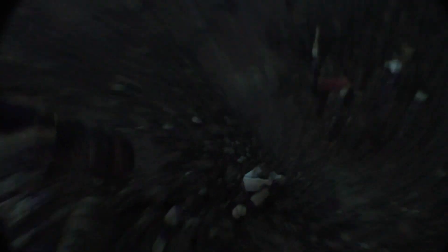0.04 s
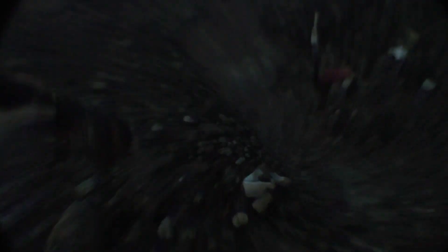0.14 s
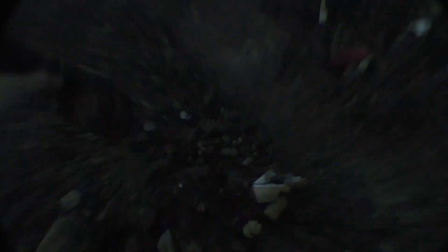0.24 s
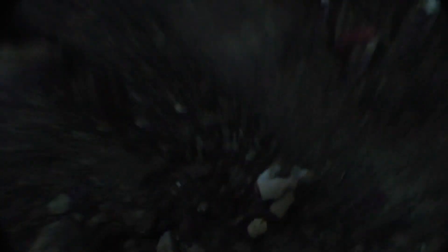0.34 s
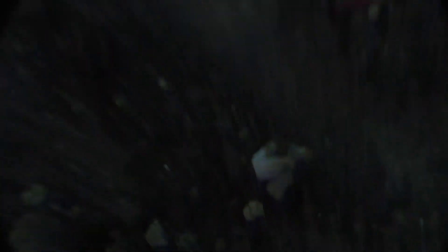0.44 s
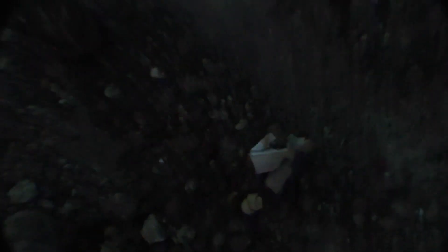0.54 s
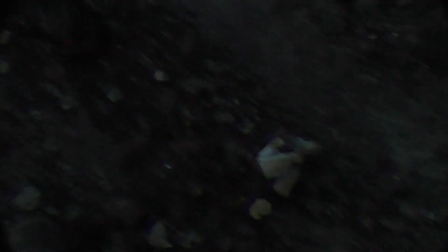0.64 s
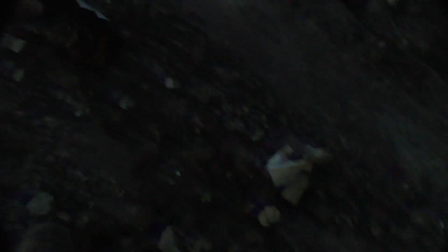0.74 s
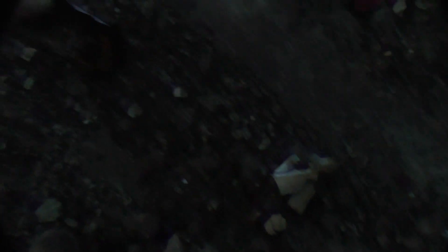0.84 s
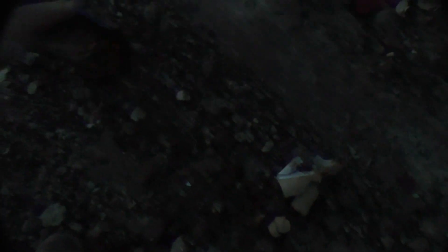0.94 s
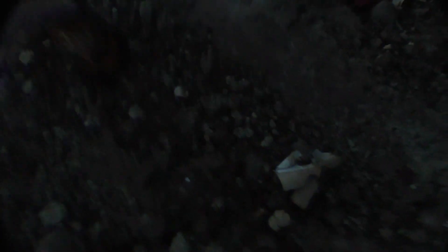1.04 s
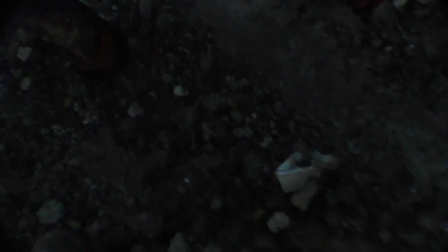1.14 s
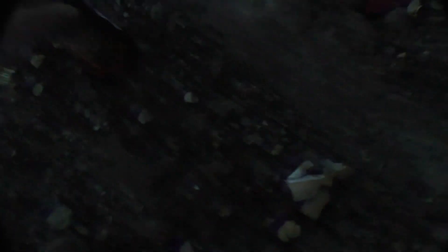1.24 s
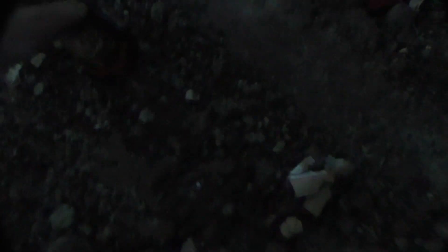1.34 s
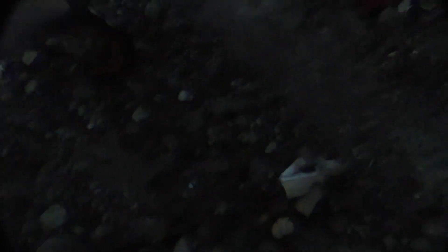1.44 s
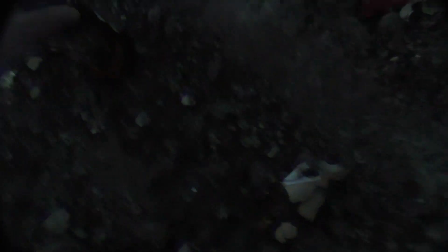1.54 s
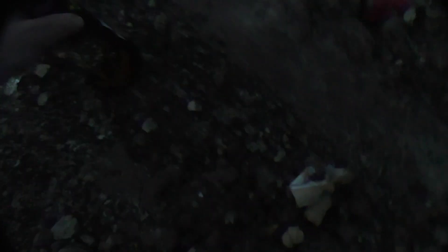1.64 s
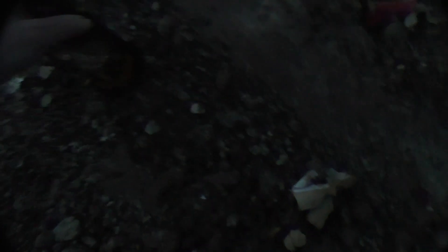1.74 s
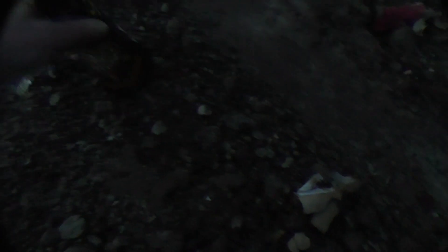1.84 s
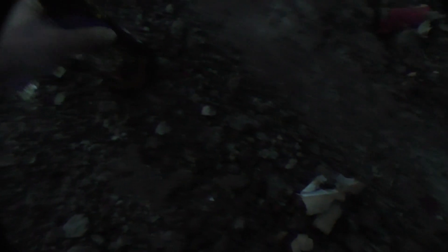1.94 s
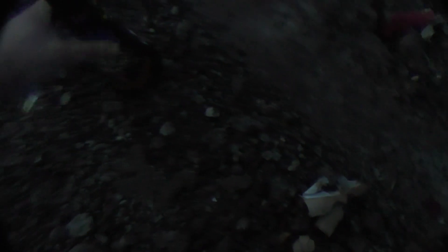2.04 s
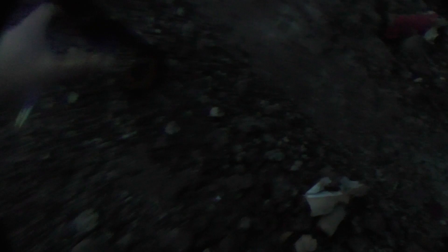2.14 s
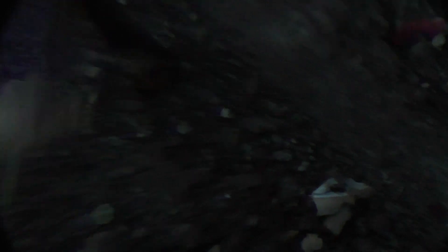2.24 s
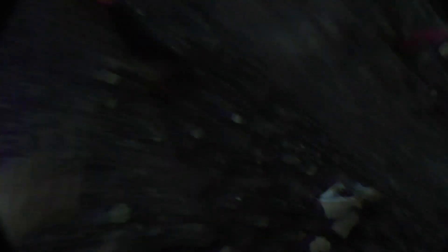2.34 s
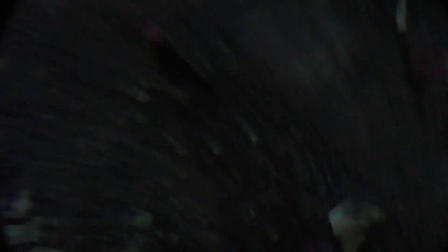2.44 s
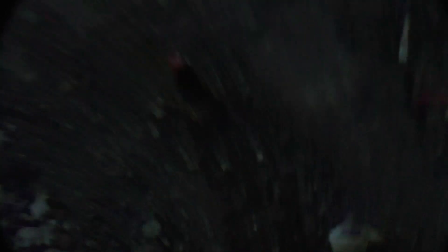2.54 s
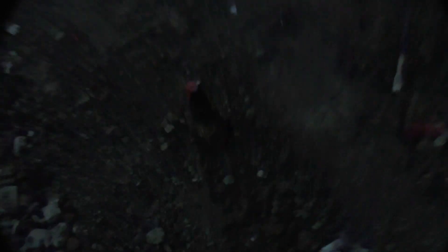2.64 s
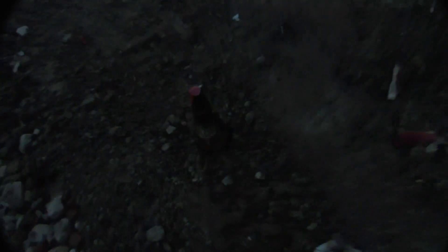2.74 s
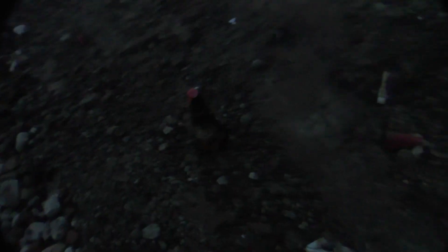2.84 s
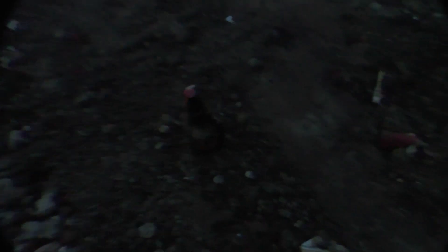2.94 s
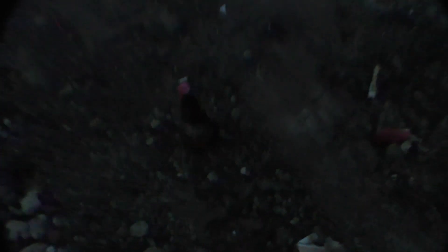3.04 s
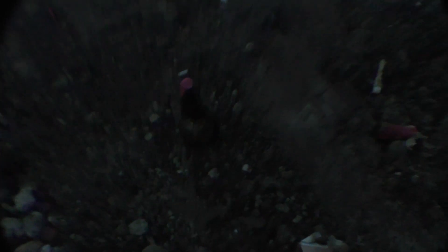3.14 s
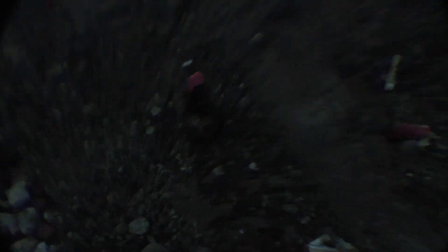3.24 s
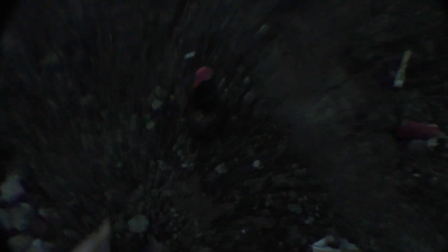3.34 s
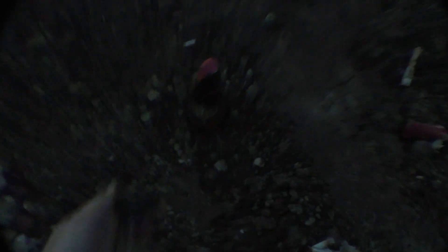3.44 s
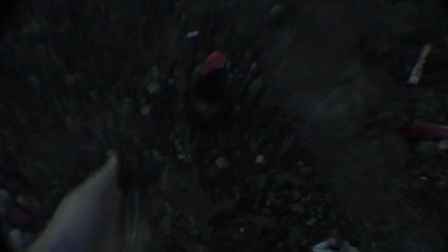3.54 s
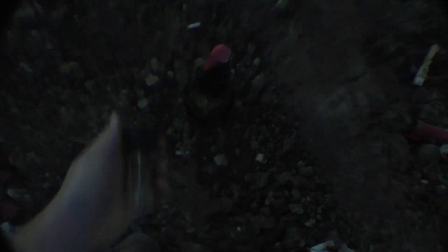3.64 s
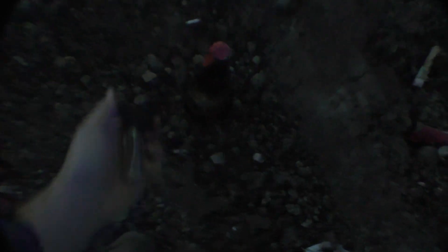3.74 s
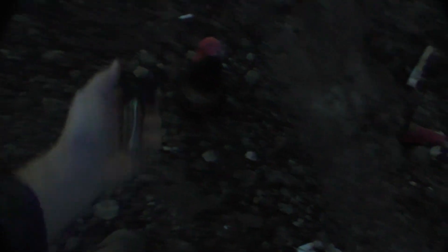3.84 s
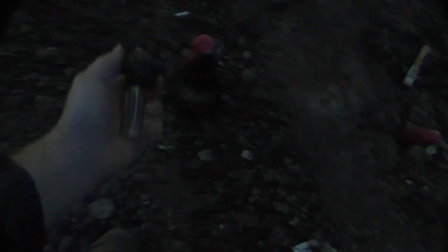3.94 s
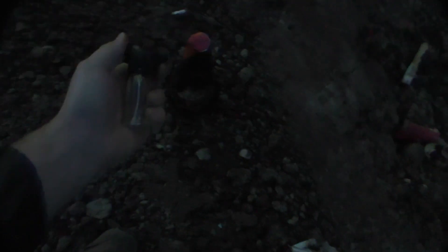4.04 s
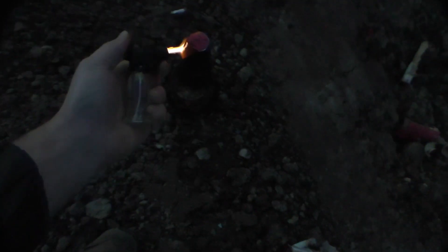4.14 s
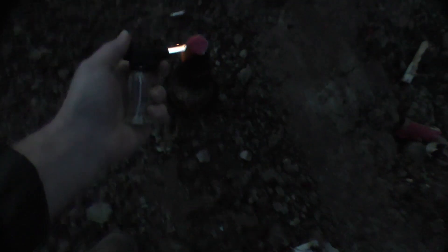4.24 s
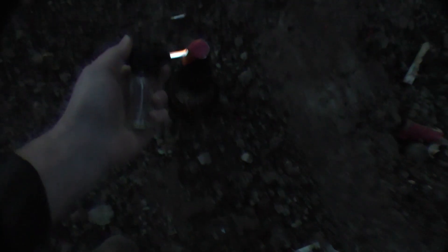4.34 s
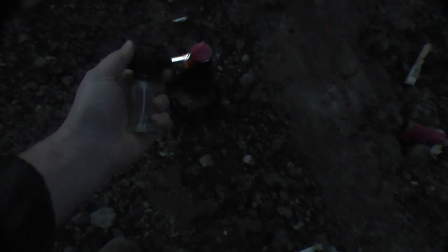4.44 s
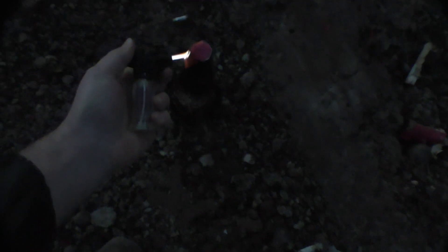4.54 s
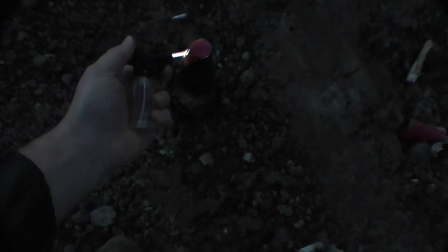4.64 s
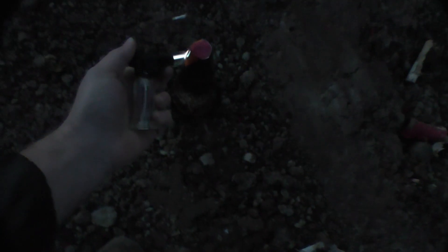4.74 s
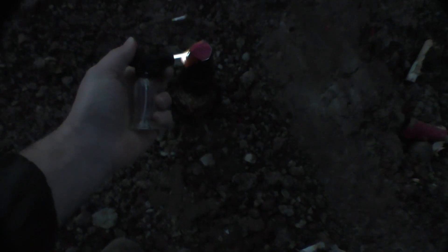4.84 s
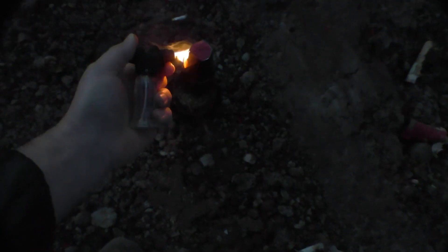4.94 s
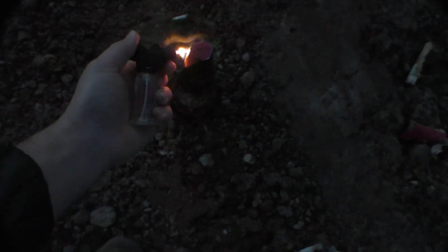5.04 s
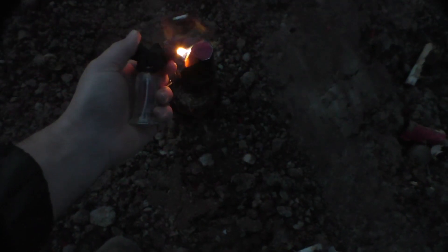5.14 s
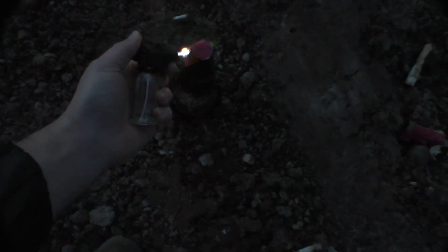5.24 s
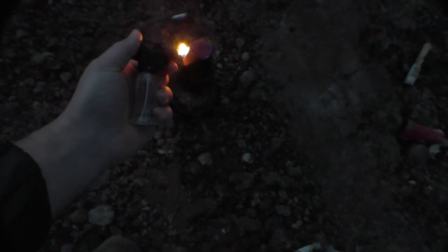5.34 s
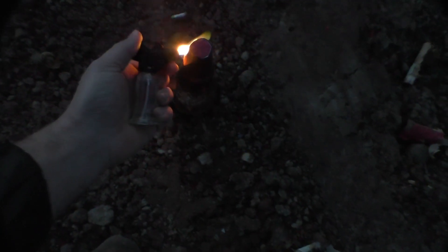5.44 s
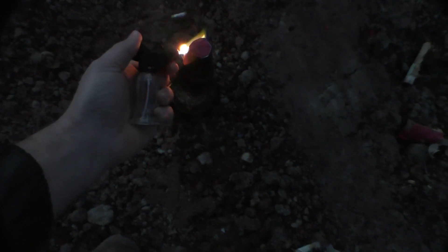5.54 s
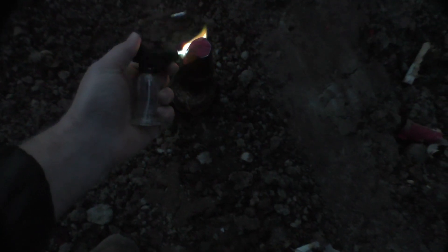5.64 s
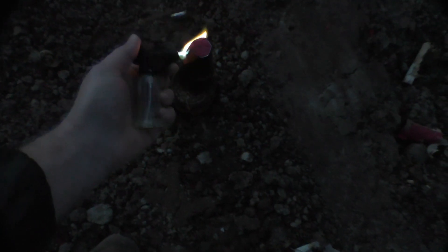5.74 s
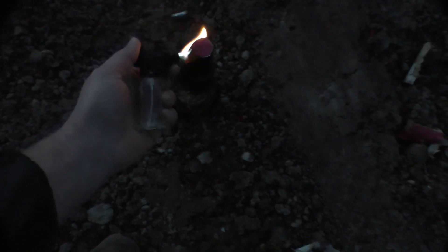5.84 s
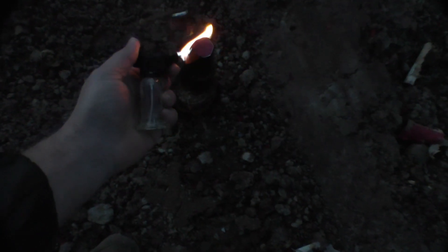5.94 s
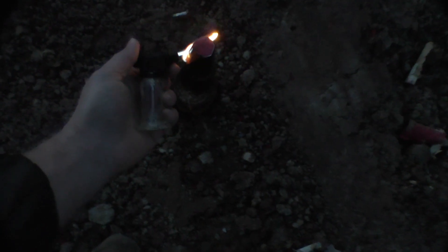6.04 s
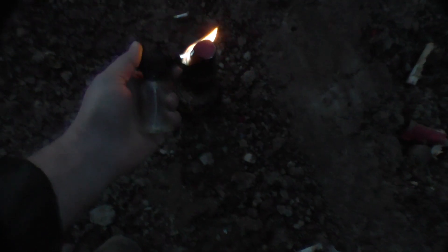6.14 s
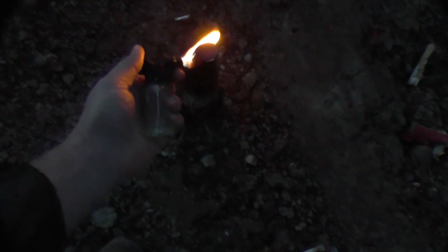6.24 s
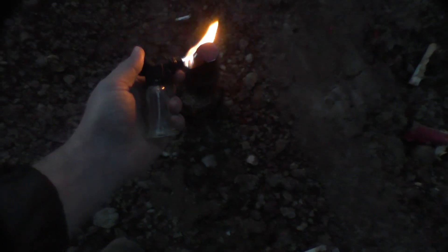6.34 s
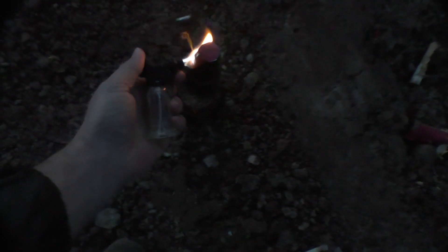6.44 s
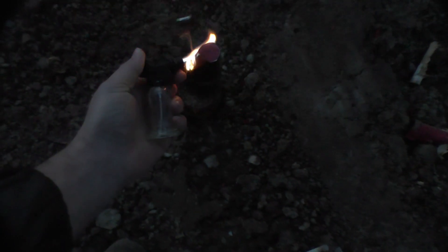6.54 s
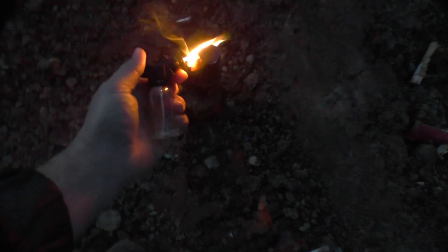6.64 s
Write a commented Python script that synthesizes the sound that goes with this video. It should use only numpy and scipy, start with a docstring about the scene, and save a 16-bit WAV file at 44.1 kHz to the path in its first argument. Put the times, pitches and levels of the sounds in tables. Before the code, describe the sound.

Shoes grind and knock over loose stones outdoors, then a jet lighter snaps sharply and roars softly and steadily, with tiny sizzling spits at the end.

```python
"""Open stony ground: someone shuffles, then a jet lighter snaps on and roars at a small firework.
Feet: dense random grains grind and hiss over a low hum; scuffs, one drag, damped thuds and stone knocks.
Lighter: clicks ring a bank of body modes; the jet is coloured noise with hiss, whistle and a close echo.
Firework: clicks ring the heated tip over a fine sizzle of grains.
Behind: a quiet rumble of air, and a deep handling rumble while the feet move."""
import sys
import numpy as np
from scipy import signal
from scipy.fft import rfft, irfft, next_fast_len
from scipy.io import wavfile

SR = 44100
rng = np.random.default_rng(int(sys.argv[2]) if len(sys.argv) > 2 else 0)


def put_to_file(sound):
    """Save the sound as 16-bit audio at rate SR, in the file named by the first command-line argument."""
    columns = np.atleast_2d(sound).T  # one column per channel
    safe = np.clip(columns, -1, 1)
    whole_steps = np.round(safe * 32767)
    wavfile.write(sys.argv[1], SR, whole_steps.astype(np.int16))


N = 295470
TIME = np.arange(N) / SR

# Open air, spectrum: freq_hz, relative_density_db
AIR_SPECTRUM = [(12, -20), (20, 0.5), (116, -7.5), (138, -7), (222, -11.5), (255, -15), (328, -18.5),
                (357, -19.5), (1260, -21.5), (1370, -23.5), (1530, -24.5), (4540, -58.5), (7110, -42),
                (10800, -50.5), (16000, -42)]
# Left-right correlation of the air: freq_hz, correlation_0_to_1
AIR_LIKENESS = [(25, 0), (70, 0.84), (1000, 0.63), (3000, 0.6), (10000, 0.24)]
# Left-right correlation of the ground: freq_hz, correlation_0_to_1
GROUND_LIKENESS = [(200, 0.83), (700, 0.9), (1600, 0.77), (4000, 0.42), (7500, 0.24), (13000, 0)]
# Left-right correlation of the jet and tip: freq_hz, correlation_0_to_1
JET_LIKENESS = [(500, 0.98), (3500, 1), (7000, 1), (14000, 0.87)]
# Flow of the sliding grit: time_s, relative_level_db
SLIDE_FLOW = [(0.0, -53), (0.042, -44.5), (0.46, -39.5), (0.78, -42.5), (1.2, -40.5), (1.32, -43.5),
              (1.462, -42.5), (1.55, -49.5)]
# Coarse grinding grains, spectrum: freq_hz, relative_density_db
GRIND_SPECTRUM = [(59, -32), (100, 3), (113, -8), (210, -3.5), (313, -5.5), (366, -2.5), (401, -7),
                  (937, -1.5), (1690, -5), (2030, -8), (2640, -15.5), (2940, -21), (4000, -18),
                  (5200, -18.5), (8800, -120)]
# Fine hissing grit, spectrum: freq_hz, relative_density_db
GRIT_HISS_SPECTRUM = [(2200, 2), (3000, -7.5), (4800, -11.5), (5600, -3.5), (8200, 1.5), (9500, -3.5),
                      (10900, -12), (12500, -5), (14500, -3.5), (16000, -13.5)]
# Position of the feet: time_s, left_minus_right_db
FEET_SIDE = [(0.05, 7), (0.52, 3), (1.44, -1.5), (2.31, 7.5), (3.11, 0), (3.23, 4), (4.1, 7.5)]
# Sole presses and scuffs over gravel: peak_s, level_db, half_length_s
SCUFFS = [(0.065, -37.5, .035), (0.5, -40.5, 0.058), (0.79, -38, 0.013), (1.06, -40.5, 0.058),
          (1.578, -42, 0.017), (1.69, -55.5, 0.063), (2.29, -54.5, 0.091), (2.54, -45.5, 0.034),
          (2.66, -47, 0.08), (2.913, -49, 0.018), (3.032, -39, 0.017), (3.1, -44, .035), (3.27, -54, 0.12),
          (3.57, -54, 0.3)]
# Scuffed pebbles, spectrum: freq_hz, relative_density_db
SCUFF_SPECTRUM = [(88, -28), (150, -9), (285, -3.5), (503, -2.5), (596, -5.5), (738, -2.5), (1130, -7.5),
                  (1780, -8), (3290, -26), (4500, -32.5), (5850, -72), (9900, -120)]
# Rustling sand, spectrum: freq_hz, relative_density_db
RUSTLE_SPECTRUM = [(2500, -33), (3400, -9), (4700, -6.5), (5800, 1), (8200, 1.5), (10800, -11),
                   (13000, -0.5), (16000, -17)]
# Sole dragging over one stone: time_s, resonance_hz, level_db
DRAG = [(2.57, 1285, -72), (2.6, 1496, -48.5), (2.66, 1732, -56), (2.77, 1730, -58), (2.84, 1690, -72)]
# Footfalls: start_s, level_db, pitch_hz, swell_cycles
THUDS = [(0.0325, -17, 228, 0.23), (0.258, -31, 225, .36), (0.4455, -17.5, 314, 0.95),
         (0.6135, -15.5, 192, 0.23), (1.1232, -15, 213, 0.29), (2.6995, -29, 310, 0.58),
         (2.896, -34.5, 230, 0.51), (3.033, -32.5, 280, .35), (3.398, -40.5, 397, 1.2)]
# Stones knocking together: start_s, level_db, pitch_hz, swell_cycles
STONES = [(0.0354, -15.5, 1290, 1.34), (0.0394, -19, 1480, 0.67), (0.2338, -19.5, 1060, 0.41),
          (0.2587, -21, 930, .4), (0.4455, -14.5, 826, 1.34), (0.6147, -17, 900, 0.45),
          (1.0847, -15, 1910, 0.4), (1.0964, -24.5, 1610, 2.3), (1.124, -19.5, 1060, 0.46),
          (1.759, -37, 1750, 1.2), (2.2494, -27, 1280, 0.43), (2.3058, -39.5, 1340, 0.69),
          (2.559, -37, 876, 2), (2.592, -32, 1210, 0.92), (2.6988, -28.5, 1200, 0.2),
          (2.9177, -29, 960, 0.21), (2.9832, -31, 1160, 0.2), (3.037, -24, 730, 0.27),
          (3.0814, -28, 1070, 0.71), (3.122, -35, 580, 1.3), (3.135, -26, 730, 0.24),
          (3.19, -33.5, 1670, 0.56), (3.311, -47.5, 4000, 0.71), (3.340, -31, 1490, 0.89),
          (3.5307, -28, 810, 0.19), (3.578, -35.5, 1560, .6)]
# Sharp ticks of grit: start_s, relative_level_db
GRIT_TICKS = [(0.4652, -23.5), (0.6314, -25), (1.6995, -46.5), (2.169, -48.5), (2.2218, -45.5),
              (2.5604, -50), (3.0049, -43), (3.0804, -40), (3.129, -43), (3.5089, -50)]
# Igniter hammer, strike and rebounds: start_s, relative_level_db
SNAP = [(4.1446, 0), (4.1454, -5), (4.1465, -11)]
# Modes of the lighter body: freq_hz, relative_level_db, t60_s
LIGHTER_MODES = [(942, -25.5, 0.03), (1850, -8, 0.026), (2170, -9.5, 0.011), (2750, -15, 0.0098),
                 (4030, -16, 0.0044), (5350, -14.5, 0.014), (5890, -7, 0.0089), (7060, -14, 0.014),
                 (8090, -14, 0.017), (9160, -25, 0.024), (11680, -19, 0.01), (12500, -18, 0.0062),
                 (13700, -11, 0.0051), (16600, -17, .009)]
# Strength of the jet: time_s, relative_level_db
JET_STRENGTH = [(4.18, -38), (4.52, -42), (5.6, -48), (5.99, -44), (6.17, -45), (6.7, -44.5)]
# Roaring flame, spectrum: freq_hz, relative_density_db
ROAR_SPECTRUM = [(250, -20), (400, -8), (520, -3), (680, -1), (1000, 0), (1250, -3), (1650, -6),
                 (2000, -10), (2300, -21.5), (2800, -25), (3300, -38), (4200, -37), (5200, -54)]
# Hissing gas, spectrum: freq_hz, relative_density_db
JET_HISS_SPECTRUM = [(3000, -20), (4500, -11), (5700, 3.5), (7200, 2), (9300, -3), (10700, -17.5),
                     (16000, -18)]
# Flame splashing on the tip: peak_s, level_db, half_length_s
FLARES = [(5.45, -66.5, 0.09), (5.78, -59, 0.064), (6.29, -62.5, .04)]
# Splashing flame, spectrum: freq_hz, relative_density_db
FLARE_SPECTRUM = [(2300, 11.5), (3000, 0), (4000, -5.5), (4700, -11.5), (5800, -2), (7000, -5.5)]
# Whistle swells as the gas flow wavers: peak_s, level_db, half_length_s
WHISTLE_SWELLS = [(4.74, -60, .06), (4.97, -60.5, 0.097), (5.35, -58, 0.12), (5.8, -60.5, 0.14),
                  (6.1, -61, 0.055)]
# Nozzle whistle, spectrum: freq_hz, relative_density_db
WHISTLE_SPECTRUM = [(10500, -35), (11800, -11.5), (13200, -3), (14400, 3), (15200, 1.5), (16000, -18)]
# Spits of the heated tip: start_s, relative_level_db
SPITS = [(5.7981, -38.5), (6.216, -41), (6.266, -46), (6.282, -35.5), (6.315, -33), (6.3713, -32.5),
         (6.4348, -41), (6.486, -36.5), (6.5035, -36), (6.519, -35), (6.5517, -36), (6.5868, -39),
         (6.6253, -36)]
# Modes of the tip: freq_hz, relative_level_db, t60_s
TIP_MODES = [(6060, -8.5, 0.004), (7260, -5, 0.0036), (8700, -7, 0.0034), (13800, -14, .003)]
# Sizzling tip, spectrum: freq_hz, relative_density_db
SIZZLE_SPECTRUM = [(4800, -7), (5900, -2), (8000, 0), (9500, -5), (10700, -20), (12800, -6), (16000, -11)]

AIR_DB = -48
GRIND_DB, GRIND_SAG_DB_PER_S = -38, 2.5  # coarse grains lose speed steadily
GRIND_END_S, GRIND_RELEASE_S = 1.66, 0.27
HISS_END_S, HISS_RELEASE_S = 1.59, 0.055  # fine grains stop first
CHURN_DB, CHURN_KNOTS_PER_S = 0.76, 18  # slightly uneven flow
HUM_HZ, HUM_DB = 70.3, -49
STANDING_DB = -59  # pebbles creak under shifting weight
STANDING_START_S, STANDING_END_S, STANDING_FADE_S = 1.5, 3.94, 0.1
SAND_DB = -14.5  # relative to the pebbles
SETTLE_MIN_S, SETTLE_MAX_S, SETTLE_LOSS_DB = 0.007164, 0.0144, 12.5
JET_START_S, RUN_ON_S = 4.148, 8  # RUN_ON_S lies past the end
LICK_DB, LICK_START_S = -67.5, 5.2  # flame on the tip between splashes
WHISTLE_DB = -63.5  # between swells
ECHO_S, ECHO_GAIN = 0.001732, 0.36  # hard surface close to the flame
CUTOFF_HZ, ROUNDING_LEVEL = 16000, 0.62


def from_db(db):
    """Decibels to amplitude gain."""
    return 10 ** (np.asarray(db) / 20)


def rms_one(x):
    """Scale to unit rms."""
    return x / np.sqrt(np.mean(x ** 2) + 1e-20)


def track(rows):
    """Interpolate each column after the time to one value per sample."""
    time_s, *columns = np.transpose(rows)
    return [np.interp(TIME, time_s, column) for column in columns]


def gate(start_s, end_s, fade_s):
    """One between two times, with straight fades inside them."""
    rise = np.clip((TIME - start_s) / fade_s, 0, 1)
    fall = np.clip((end_s - TIME) / fade_s, 0, 1)
    return rise * fall


def swells(rows):
    """Bell-shaped power rises and falls, one per row; their powers add."""
    power = np.zeros(N)
    for peak_s, level_db, half_s in rows:
        bell = np.exp(-np.minimum(((TIME - peak_s) / half_s) ** 2, 100))
        power += from_db(level_db) ** 2 * bell
    return np.sqrt(power)


def at_hz(points, hz):
    """Read a table on a log-frequency axis."""
    table = np.array(points)
    return np.interp(np.log(hz + 1), np.log(table[:, 0]), table[:, 1])


def pan(x, left_db):
    """Split a left-minus-right level difference evenly between the channels."""
    return x * from_db(np.array([[1], [-1]]) * left_db / 2)


def band(x, low_hz, high_hz, order=2):
    """Causal Butterworth band-pass."""
    edges_hz = [low_hz, min(high_hz, 0.49 * SR)]
    return signal.sosfilt(signal.butter(order, edges_hz, "band", fs=SR, output="sos"), x + 1e-18)


def drift(knots_per_s):
    """Random wander of unit rms, straight between knots."""
    knots = rng.standard_normal(4096)
    return rms_one(np.interp(TIME * knots_per_s, np.arange(len(knots)), knots))


def turbulence(flutter_db):
    """Two white noises whose strength flutters together."""
    return rng.standard_normal((2, N)) * from_db(flutter_db * drift(70))


def grains(per_s, spread_db, clump_db):
    """Stereo collisions at shared random instants; sizes spread exponentially in dB and vary in clumps."""
    born = rng.random(N) < per_s / SR
    spread = spread_db * np.minimum(rng.exponential(1, N), 4)
    sizes = from_db(spread + clump_db * drift(90))
    return born * sizes * rng.standard_normal((2, N))


def colour(pair, spectrum, likeness):
    """Shape two unrelated signals into stereo with a set spectrum and correlation; rms 1."""
    size = next_fast_len(N)
    hz = np.arange(size // 2 + 1) * SR / size
    low_edge = 1 / (1 + (spectrum[0][0] / (hz + 1)) ** 8)
    high_edge = 1 / (1 + (hz / spectrum[-1][0] / 1.1) ** 16)
    mid, side = rfft(pair, size) * from_db(at_hz(spectrum, hz)) * low_edge * high_edge
    alike = np.clip(at_hz(likeness, hz), -1, 1)
    stereo = np.sqrt(1 + alike) * mid + np.sqrt(1 - alike) * side * [[1], [-1]]
    return rms_one(irfft(stereo, size)[:, :N])


def clicks(rows):
    """One impulse per row of start_s, level_db."""
    out = np.zeros(N)
    for start_s, level_db, *_ in rows:
        out[round(start_s * SR)] += from_db(level_db)
    return out


def bursts(rows, decay_s):
    """A dying stereo puff of noise per row of start_s, level_db."""
    envelope = signal.lfilter([1], [1, -np.exp(-1 / (decay_s * SR))], clicks(rows) + 1e-18)
    return envelope * rng.standard_normal((2, N))


def ring(x, freq_hz, t60_s):
    """Two-pole resonator: a unit click starts a decaying unit sine."""
    radius = from_db(-60 / (t60_s * SR))
    angle = 2 * np.pi * freq_hz / SR
    poles = [1, -2 * radius * np.cos(angle), radius * radius]
    return signal.lfilter([0, np.sin(angle)], poles, x + 1e-18)


def struck(blows, modes):
    """Ring every mode of a body, with alternating signs."""
    out = np.zeros(N)
    for k, (freq_hz, level_db, t60_s) in enumerate(modes):
        out += (-1) ** k * from_db(level_db) * ring(blows, freq_hz, t60_s)
    return out


def knocks(rows):
    """Heavily damped contacts: each sine swells and dies within a few cycles."""
    out, age_s = np.zeros(N), TIME[:SR // 10]
    for start_s, level_db, pitch_hz, swell_cycles in rows:
        swell = age_s * pitch_hz / swell_cycles
        envelope = from_db(level_db) * swell * np.exp(1 - swell)
        start = round(start_s * SR)
        out[start:start + len(age_s)] += envelope * np.sin(2 * np.pi * pitch_hz * age_s)
    return out


def near_echo(x):
    """One close reflection carves evenly spaced notches."""
    late = np.array([np.interp(TIME - ECHO_S, TIME, channel) for channel in x])
    return (x + ECHO_GAIN * late) / np.hypot(1, ECHO_GAIN)


def open_air():
    """Coloured noise makes the steady, mostly low rumble of open air."""
    air = colour(rng.standard_normal((2, N)), AIR_SPECTRUM, AIR_LIKENESS)
    return pan(from_db(AIR_DB) * air, left_db=2.5)


def handling_rumble():
    """Handling rumble while the feet move: fluttering noise in a deep band."""
    rumble = rms_one(band(turbulence(flutter_db=-1.0), 16.4, 54.4))
    return from_db(-51.0) * rumble * gate(1.57, 4.44, 0.49)


def sliding_grit():
    """Coarse grains grind, fine ones hiss, and a wavering hum fades a little before them."""
    grind_gain = from_db(GRIND_DB - GRIND_SAG_DB_PER_S * TIME) * gate(-1, GRIND_END_S, GRIND_RELEASE_S)
    coarse = colour(grains(per_s=3500, spread_db=0.5, clump_db=2.0), GRIND_SPECTRUM, GROUND_LIKENESS)

    flow = from_db(track(SLIDE_FLOW)[0]) * from_db(CHURN_DB * drift(CHURN_KNOTS_PER_S))
    hiss_gain = from_db(3.0) * flow * gate(-1, HISS_END_S, HISS_RELEASE_S)
    fine = colour(grains(per_s=15000, spread_db=-1.0, clump_db=1.17), GRIT_HISS_SPECTRUM, GROUND_LIKENESS)

    phase = 2 * np.pi * np.cumsum(HUM_HZ * (1 + 0.033 * drift(9.4))) / SR
    hum = from_db(HUM_DB + 2.0 * drift(4.8)) * np.sqrt(2) * np.sin(phase)
    grit = pan(grind_gain * coarse, track(FEET_SIDE)[0]) + pan(hiss_gain * fine, left_db=1.0)
    return grit + hum * gate(-1, 1.46, 0.23)


def shuffling():
    """Soles crush loose pebbles; the same pressure makes the sand rustle above."""
    standing = from_db(STANDING_DB) * gate(STANDING_START_S, STANDING_END_S, STANDING_FADE_S)
    pressure = np.hypot(swells(SCUFFS), standing)
    pebbles = colour(grains(per_s=1800, spread_db=1.5, clump_db=1.5), SCUFF_SPECTRUM, GROUND_LIKENESS)
    sand = colour(grains(per_s=7000, spread_db=3.0, clump_db=1.1), RUSTLE_SPECTRUM, GROUND_LIKENESS)
    low = pan(pressure * pebbles, track(FEET_SIDE)[0])
    return low + pan(pressure * from_db(SAND_DB) * sand, left_db=3.0)


def dragging():
    """A scrape rings in one broad resonance that rises as the sole presses down, then holds."""
    resonance_hz, level_db = track(DRAG)
    rasp = signal.sosfilt(signal.butter(2, 170, fs=SR, output="sos"), rng.standard_normal(N))
    # the sine shifts the slow rasp up to the resonance
    scrape = rms_one(rasp * np.sin(2 * np.pi * np.cumsum(resonance_hz) / SR))
    return pan(from_db(level_db) * scrape * gate(2.56, 2.85, 0.02), left_db=5)


def footsteps():
    """Heels thud; each stone knocks, touches once more as it settles and sheds crushed grit."""
    delays_s = rng.uniform(SETTLE_MIN_S, SETTLE_MAX_S, len(STONES))
    settling = [(start_s + delay_s, level_db - SETTLE_LOSS_DB, pitch_hz, swell_cycles)
                for (start_s, level_db, pitch_hz, swell_cycles), delay_s in zip(STONES, delays_s)]
    contacts = knocks(THUDS) + knocks(STONES) + knocks(settling)
    crumbs = from_db(-6) * band(bursts(STONES, decay_s=0.015), 450, 1660, order=3)
    ticks = from_db(5.5) * band(bursts(GRIT_TICKS, decay_s=0.0023), 5800, 9100)
    return pan(contacts + crumbs, track(FEET_SIDE)[0]) + ticks


def igniter():
    """The sprung hammer cracks against the crystal; the body rings and the hand takes the jolt."""
    body = from_db(-0.5) * struck(clicks(SNAP), LIGHTER_MODES)
    crack = from_db(-15.0) * band(bursts(SNAP, decay_s=0.0018), 900, 12000)
    scatter = from_db(-35) * band(bursts(SNAP, decay_s=0.0088), 4500, 8800)  # thrown back by the ground
    jolt = knocks([(4.1487, -19, 160, 0.14)])
    return pan(body + crack + scatter + jolt, left_db=2.0)


def jet():
    """Turbulent flame roars and splashes on the tip; gas hisses and whistles through the nozzle."""
    strength = from_db(track(JET_STRENGTH)[0])
    roar = from_db(0.45) * strength * colour(turbulence(flutter_db=0.88), ROAR_SPECTRUM, JET_LIKENESS)

    # hiss grows faster than the roar as the jet strengthens
    hiss_gain = from_db(-61.5) * (strength / strength.max()) ** 1.48
    hiss = hiss_gain * colour(turbulence(flutter_db=1.5), JET_HISS_SPECTRUM, JET_LIKENESS)

    lick = from_db(LICK_DB) * gate(LICK_START_S, RUN_ON_S, 0.077)
    contact = np.hypot(swells(FLARES), lick)
    splash = contact * colour(turbulence(flutter_db=1.0), FLARE_SPECTRUM, JET_LIKENESS)

    whistle_gain = np.hypot(from_db(WHISTLE_DB), swells(WHISTLE_SWELLS))
    whistle = whistle_gain * colour(turbulence(flutter_db=0.3), WHISTLE_SPECTRUM, JET_LIKENESS)

    flame = pan(near_echo(roar + hiss + splash), left_db=1.55) * gate(JET_START_S, RUN_ON_S, 0.0018)
    return flame + pan(whistle, left_db=1.0) * gate(JET_START_S, RUN_ON_S, 0.02)


def heated_tip():
    """The tip spits in short rings and spray over a fine sizzle as it catches."""
    spits = band(from_db(0.5) * struck(clicks(SPITS), TIP_MODES), 4800, 16000, order=3)
    spray = from_db(-10.0) * band(bursts(SPITS, decay_s=0.0042)[0], 5500, 10000, order=4)
    fizz = colour(grains(per_s=1100, spread_db=1.0, clump_db=2.5), SIZZLE_SPECTRUM, JET_LIKENESS)
    sizzle = from_db(-61.5) * fizz * gate(6.17, RUN_ON_S, 0.071)
    return pan(spits + spray + sizzle, left_db=2.5)


def scene():
    """Sum of the open air, handling rumble, feet on the ground, lighter and firework tip."""
    background = open_air() + handling_rumble()
    ground = sliding_grit() + shuffling() + dragging() + footsteps()
    return background + ground + igniter() + jet() + heated_tip()


def record(dry):
    """Shed the deepest rumble, softly round the peaks and cut the top steeply."""
    lean = signal.sosfilt(signal.butter(1, 24, "high", fs=SR, output="sos"), dry)
    rounded = ROUNDING_LEVEL * np.tanh(lean / ROUNDING_LEVEL)
    return signal.sosfilt(signal.ellip(10, 0.2, 70, CUTOFF_HZ, fs=SR, output="sos"), rounded)


dry = scene()
out = record(dry)
put_to_file(out)
```